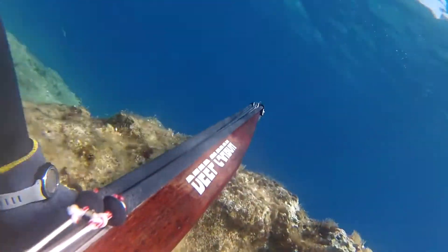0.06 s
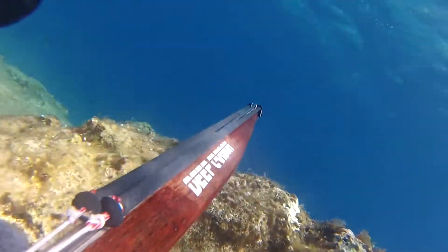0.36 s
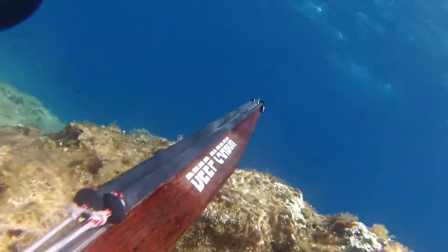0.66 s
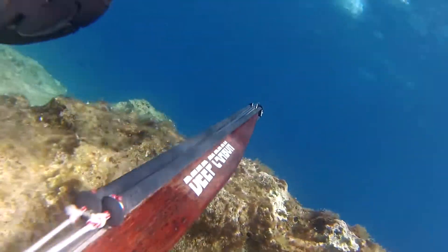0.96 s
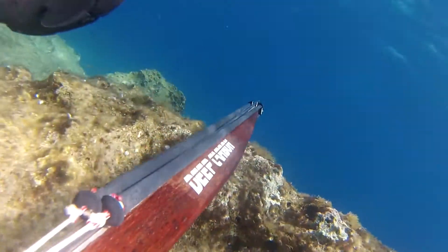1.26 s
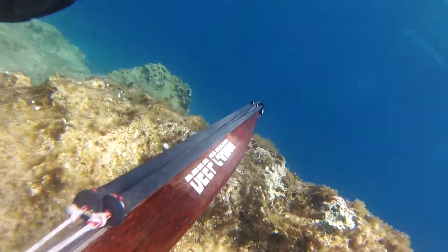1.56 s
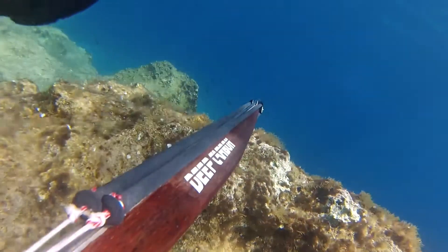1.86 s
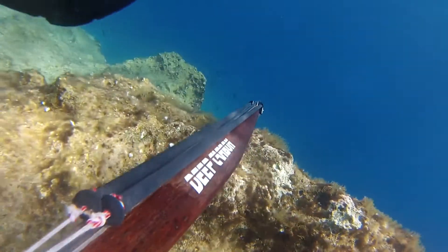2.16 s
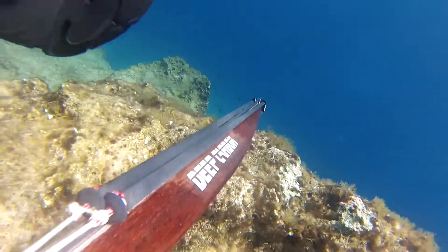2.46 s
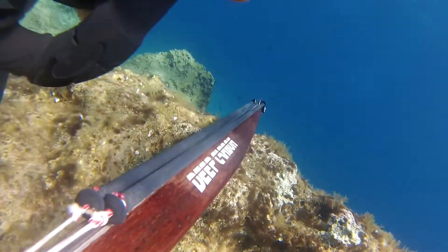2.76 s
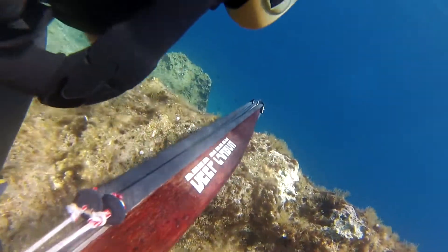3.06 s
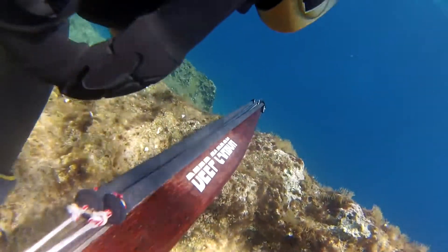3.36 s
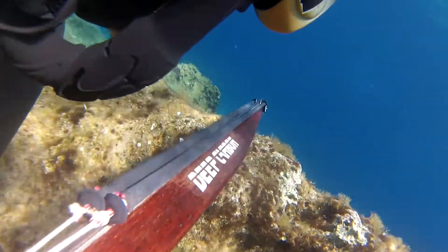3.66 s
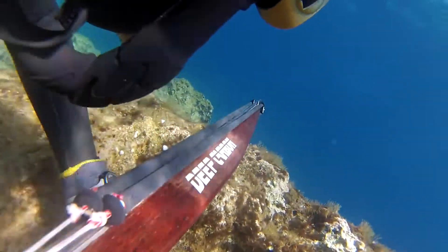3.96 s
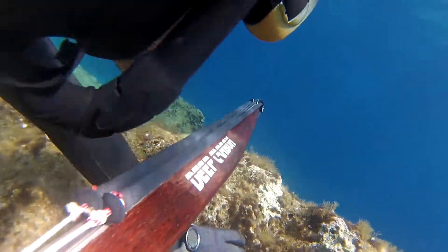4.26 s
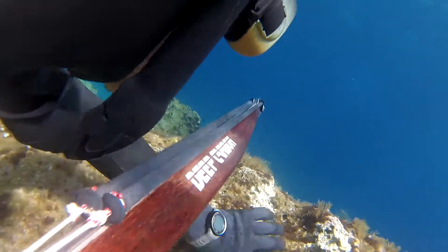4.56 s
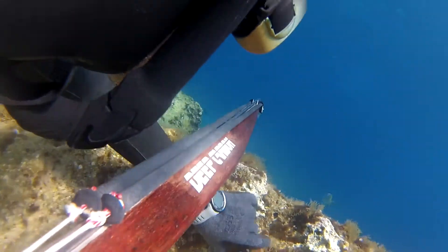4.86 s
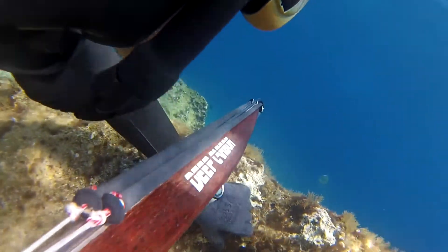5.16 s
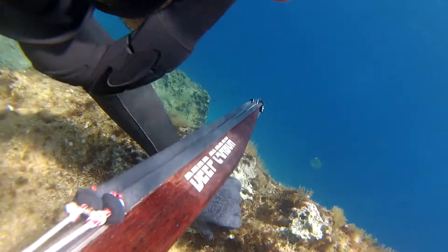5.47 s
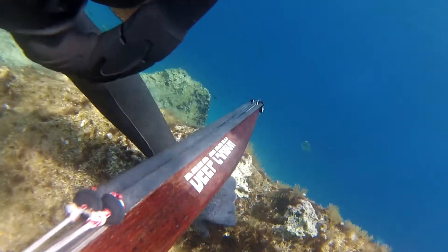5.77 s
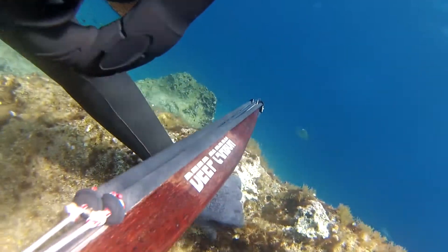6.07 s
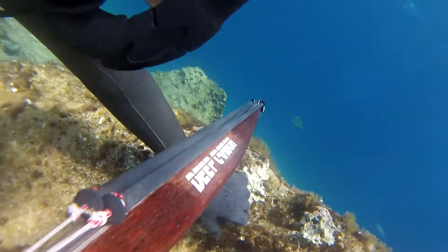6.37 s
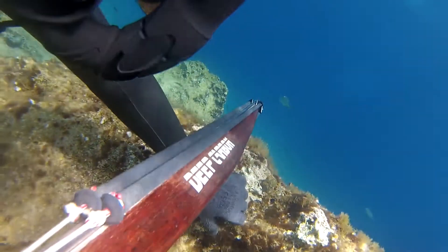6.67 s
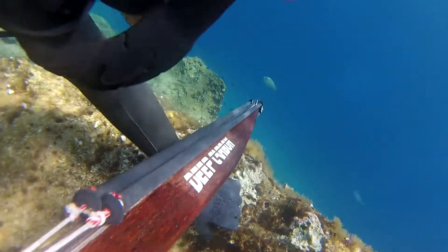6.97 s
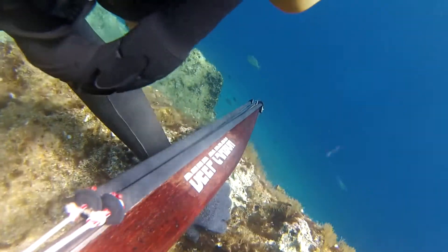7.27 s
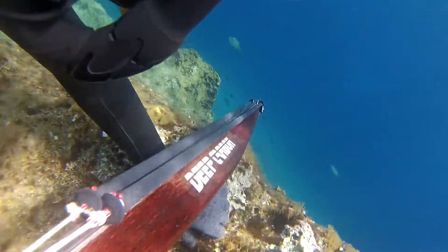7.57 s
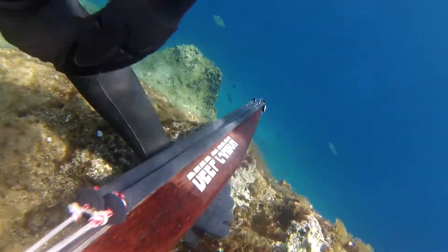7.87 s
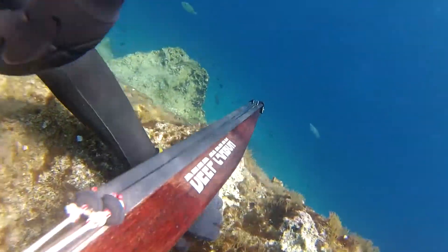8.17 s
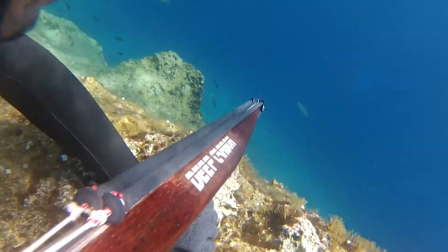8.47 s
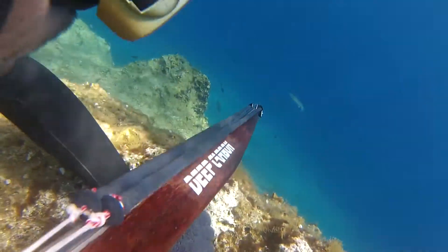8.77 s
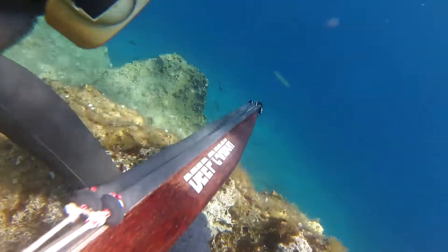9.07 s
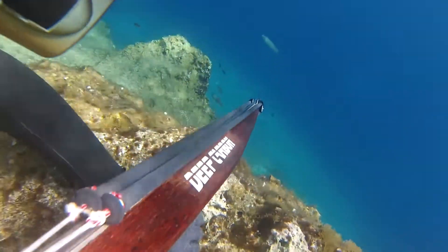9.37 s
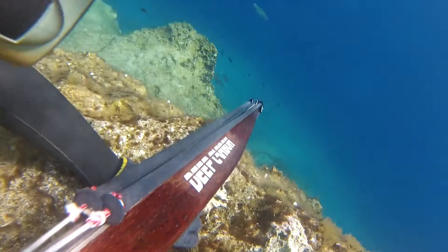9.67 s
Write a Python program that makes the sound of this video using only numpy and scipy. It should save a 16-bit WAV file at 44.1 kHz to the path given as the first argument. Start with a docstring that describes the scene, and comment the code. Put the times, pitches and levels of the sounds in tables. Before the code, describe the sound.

A burst of gulping air and low water buffeting opens, close and muffled, as a diver pulls along an underwater rock. Irregular clusters of sharp clacks with dull thumps come from a speargun jolting against the camera housing, mixed with rubber rubbing, light fizzing and tiny shrimp clicks. The rumble eases for a few seconds, then swells again with the sharpest knock and more rubbing.

```python
"""First comes a deep rumble of water with gulps and dull knocks, heard inside a camera housing on a
speargun as a free diver pulls himself along a rock. Water buffets the housing, and the gun knocks in
its mount, each knock a click with a dip in pressure. Trapped air gulps and fizzes as it vibrates.
Glove and wetsuit rub and crunch on the rock, and shrimp snap on the reef over a faint hiss."""
import sys
import numpy as np
from scipy import signal
from scipy.fft import rfft, irfft
from scipy.io import wavfile
from scipy.ndimage import uniform_filter1d, minimum_filter1d

SR = 44100
rng = np.random.default_rng(int(sys.argv[2]) if len(sys.argv) > 2 else 0)


def digitize_waveform(pressure):
    """Quantize a signal to 16-bit integers and store it at the path in sys.argv[1].

    Rows of a 2-D input are taken as channels; values are limited to [-1, 1].
    """
    field = np.atleast_2d(pressure).T
    bounded = np.clip(field, -1, 1)
    quanta = np.round(bounded * 32767).astype(np.int16)
    wavfile.write(sys.argv[1], SR, quanta)


N = 437472
TIME = np.arange(N) / SR
SLOW_TIME = np.arange(0, N, 40) / SR   # coarser steps, enough for movements

# Each TONE table gives the balance from low to high pitch.
# the surge, slow swings of water pressure: pitch_hz, level_db
SURGE_TONE = [(8.2, -33), (14, 10.5), (35, -0.5), (47, -8.5), (65, -16.5), (140, -29), (180, -35),
              (310, -120)]
# eddies, small swirls of water: pitch_hz, level_db
EDDY_TONE = [(45, -11), (75, -4), (130, -1), (190, -12), (280, -17.5), (450, -26.5)]
# the current flowing past the housing: time_s, level_db
CURRENT = [(0.0, -37), (0.44, -47), (1.08, -33), (1.6, -38.5), (2.2, -41.5), (2.7, -32), (2.9, -45.5),
           (3.2, -41.5), (3.6, -34.5), (4.03, -41.5), (4.36, -32.5), (5.1, -35), (5.95, -44), (6.55, -37),
           (7.15, -46), (7.7, -45.5), (8.55, -35), (8.9, -29.5), (9.35, -33), (9.6, -42), (9.92, -44)]
# shoves of water as the diver moves: peak_s, half_length_s, surge_db, eddy_db
SHOVES = [(0.19, 0.053, -23.5, -40), (0.292, 0.033, -18.5, -33), (0.462, 0.1, -24, -41.5),
          (0.593, 0.021, -15.5, -34.5), (0.812, .03, -15.5, -40.5), (0.986, 0.063, -29, -42),
          (1.257, 0.051, -31, -42), (1.818, 0.036, -20, -50), (2.039, 0.045, -30.5, -43),
          (2.305, 0.053, -29, -69), (2.553, 0.042, -21.5, -47.5), (2.86, .03, -41, -42.5),
          (3.014, 0.038, -22, -40), (3.369, 0.016, -16.5, -35), (3.513, 0.026, -27, -38),
          (3.63, 0.016, -17, -46), (3.875, 0.017, -27, -40), (4.26, 0.061, -20.5, -33),
          (4.406, 0.044, -24, -42), (4.623, 0.022, -22.5, -40.5), (4.74, 0.027, -21, -46),
          (5.06, 0.056, -28.5, -47.5), (5.229, 0.047, -29.5, -57), (5.46, 0.02, -37, -61),
          (5.581, 0.026, -31.5, -55), (6.267, 0.029, -19, -41), (6.379, 0.073, -28.5, -59),
          (6.602, 0.021, -21.5, -45), (7.83, 0.048, -16.5, -54), (8.06, 0.12, -31.5, -50.5),
          (8.297, 0.031, -21.5, -32), (8.376, 0.013, -15, -31), (8.711, 0.069, -19.5, -34.5),
          (8.778, 0.069, -14.5, -40), (9.011, 0.027, -13, -32.5), (9.113, 0.045, -23.5, -38),
          (9.272, 0.017, -22.5, -31.5), (9.421, 0.07, -25, -46)]
# the gun knocking in its mount: start_s, click_db, pitch_hz, dip_db (before dip_boost_db)
KNOCKS = [(0.117, -38, 970, -39), (0.237, -30.5, 860, -38), (0.284, -30, 910, -28), (0.423, -52, 1406, -25),
          (0.492, -47.5, 1400, -32), (0.554, -29, 1080, -27.5), (0.771, -26.5, 930, -51),
          (0.779, -26.5, 1310, -24), (0.964, -25.5, 1340, -27.5), (1.22, -37.5, 930, -35),
          (1.28, -36, 1180, -37.5), (1.713, -39, 1070, -40), (1.774, -32.5, 885, -30),
          (1.824, -41.5, 918, -37.5), (1.842, -38.5, 939, -45), (1.987, -31, 1150, -48),
          (1.999, -23, 1200, -27.5), (2.266, -39.5, 1230, -38.5), (2.282, -31, 874, -52),
          (2.461, -55, 1160, -32.5), (2.522, -36, 970, -34.5), (2.683, -47.5, 1310, -39),
          (2.841, -33.5, 1270, -50), (2.958, -41.5, 939, -40), (3.28, -38.5, 1190, -39),
          (3.326, -31, 910, -32), (3.373, -30, 1220, -25.5), (3.587, -28, 1270, -29),
          (3.612, -25.5, 1210, -28.5), (4.221, -24.5, 1120, -33), (4.234, -34, 1340, -26),
          (4.253, -33.5, 888, -44), (4.271, -38, 930, -38), (4.311, -30.5, 980, -28),
          (4.333, -32, 1100, -53), (4.342, -33, 860, -21.5), (4.399, -35, 1300, -35),
          (4.524, -33.5, 1190, -31.5), (4.579, -32, 900, -33), (5.24, -41.5, 1220, -45),
          (6.221, -46, 930, -37), (6.254, -34, 960, -39), (6.586, -37, 1320, -37.5),
          (7.796, -23, 1150, -23.5), (8.158, -41.5, 1500, -41), (8.26, -48, 1230, -30.5),
          (8.298, -17, 1060, -22), (8.334, -28, 890, -28.5), (8.384, -38, 990, -33),
          (8.414, -44.5, 996, -33), (8.458, -45.5, 1300, -35.5), (8.691, -26, 960, -26.5),
          (8.78, -24.5, 1430, -23), (8.931, -34, 1150, -27), (8.957, -29.5, 905, -30.5),
          (9.01, -31.5, 1280, -23), (9.039, -38.5, 1420, -37), (9.099, -33.5, 1400, -34),
          (9.261, -33.5, 1220, -20), (9.304, -33.5, 1160, -35)]
# the notes the mount rings with: pitch_hz, relative_db, ring_s (time to fade by 60 dB)
MOUNT_NOTES = [(480, -10.5, 0.021), (694, -2.5, 0.0067), (1030, 1, 0.0091), (1230, -6, 0.012),
               (1745, -7, 0.006), (2010, -15.5, 0.0033)]
# pockets of trapped air: start_s, peak_db, pitch_hz, ring_cycles (to fade by 60 dB)
GULPS = [(0.041, -31, 99.2, 13), (0.055, -45.5, 750, 37), (0.133, -29, 151, 0.5), (0.147, -37, 1950, 75),
         (0.204, -20.5, 76, 8), (0.236, -32, 730, 6), (0.244, -37, 2340, 39), (0.27, -32, 354, 6),
         (0.275, -50, 3430, 45), (0.298, -23.5, 257, 7.5), (0.37, -36, 262, 13), (0.424, -34, 744, 19),
         (0.431, -28, 280, 20), (0.454, -16, 73, 7.5), (0.462, -28, 267, 23), (0.477, -21.5, 100, 6.5),
         (0.478, -28, 247, 13), (0.491, -34.5, 730, 14), (0.497, -25.5, 268, 12), (0.966, -29.5, 637, 17),
         (1.148, -38.5, 235, 7), (2.178, -54.5, 3400, 50), (2.282, -22, 728, 14), (2.864, -43, 155, 16),
         (6.178, -34.5, 181, 3), (7.846, -34.5, 300.4, 4.5), (8.083, -44.5, 2820, 74),
         (8.105, -52, 3800, 63), (8.108, -46, 274, 40), (8.287, -21, 110, 3), (8.307, -17, 189, 9.5),
         (8.624, -42.5, 1380, 27), (8.692, -29.5, 990, 12), (9.265, -24, 123, 6.5)]
# water squeezed out of the suit: middle_s, half_length_s, level_db
SQUELCHES = [(0.232, 0.049, -50), (0.545, .05, -46.5), (1.45, 0.23, -60), (3.468, 0.072, -50.5),
             (1.75, 0.12, -61.5), (2.8, .25, -67), (4.4, 0.069, -67), (5.2, 0.29, -70), (6.35, 0.19, -66),
             (8.873, 0.056, -52.5), (9.25, 0.12, -58.5), (9.748, 0.25, -63.5)]
# strokes of wetsuit and glove: peak_s, rise_s, fade_s, dull_db, bright_db
STROKES = [(0.15, 0.044, 0.05, -53, -62.5), (0.28, 0.069, .55, -52.5, -58.5), (1.7, 0.94, 0.71, -63, -74.5),
           (2.81, 0.073, 0.055, -61.5, -76), (4.2, .12, 0.2, -57, -60), (4.7, 0.57, 0.77, -62.5, -73),
           (6.7, 0.37, 0.26, -73, -72), (7.791, 0.32, 0.4, -64, -71.5), (8.07, 0.11, .11, -68, -65),
           (8.74, 0.16, 0.33, -57, -67.5), (9.22, 0.15, 0.28, -51.5, -58.5), (9.75, 0.16, 0.6, -58, -65)]
# the lower notes of the housing: pitch_hz, width_hz, relative_db
HOUSING_LOW = [(707, 98, 6), (1237, 210, -2)]
# the higher notes of the housing: pitch_hz, width_hz, relative_db
HOUSING_HIGH = [(1974, 58, 12.5), (2280, 235, 8.5), (3373, 120, 4), (4920, 260, -7)]
# short brushes over the weedy rock: middle_s, half_length_s, level_db
BRUSHES = [(1.386, 0.029, -49), (3.156, 0.031, -60.5), (3.48, 0.027, -45), (3.535, 0.026, -57.5),
           (3.618, 0.019, -58), (3.875, 0.028, -50.5), (7.724, .06, -70), (8.093, 0.032, -65)]
# brushed weed: pitch_hz, level_db
BRUSH_TONE = [(900, -13.5), (1350, -4.5), (1750, 2), (2600, -16.5), (3600, -15), (5500, -28.5), (7200, -28),
              (12000, -39)]
# the glove crunching on gritty rock: middle_s, half_length_s, level_db
CRUNCHES = [(0.037, .07, -62.5), (0.327, 0.22, -63), (6.647, 0.2, -71.5), (7.05, .12, -71),
            (7.7, 0.17, -66), (9.199, 0.071, -64.5), (9.787, 0.076, -65.5)]
# crunched grit: pitch_hz, level_db
GRIT_TONE = [(1500, -11), (2150, 5.5), (2900, -8), (3500, -2), (5000, -16), (7000, -11), (10000, -21)]
# hard ticks of the gun's fittings: start_s, peak_db, pitch_hz
TICKS = [(0.022, -41, 5560), (0.096, -39.5, 5200), (0.097, -42.5, 1270), (0.221, -44, 2100),
         (0.244, -45, 5400), (2.4245, -27, 2100), (2.4251, -31.5, 3380), (2.864, -52, 4900),
         (4.223, -50, 2700), (7.796, -49, 2500), (8.298, -38.5, 2930), (8.783, -48, 2500)]
# shrimp close by: start_s, peak_db, pitch_hz
SNAPS = [(0.293, -45.5, 5550), (0.419, -47, 9500), (0.4885, -48, 9000), (0.769, -44.5, 6000),
         (0.857, -50, 6900), (1.1233, -49, 6540), (1.286, -50, 5490), (1.544, -47, 6740),
         (1.7795, -50, 4730), (2.4249, -39, 6740), (2.8635, -43.5, 4850), (3.7334, -52, 6750),
         (4.14, -37.5, 10600), (4.562, -51, 8980), (5.143, -51.5, 4770), (5.5664, -51, 5090),
         (5.887, -45.5, 6960), (6.231, -48, 7000), (7.1001, -51, 6650), (7.459, -47.5, 6640),
         (8.298, -48, 5900), (8.696, -44, 5130), (8.773, -51, 4500), (8.7802, -47.5, 4560),
         (9.239, -46, 6570), (9.2773, -43, 9590)]
# the hiss of the electronics: pitch_hz, level_db
HISS_TONE = [(200, 0.5), (330, -3), (480, -5.5), (720, -1), (900, -11), (1200, -8), (1600, -10),
             (2300, -11.5), (3050, -15.5), (6800, -19), (8500, -20.5), (11500, -20.5), (13800, -24),
             (15500, -28)]
# the whine of the electronics: pitch_hz, width_hz, level_db
WHINE = [(4376, 14, -89), (13067, 16, -88), (13126, 30, -91)]


def water(surge, eddy, eddies_per_s=80, flutter_db=2.5):
    """Slow pressure swings push on the housing, with lumpy eddies riding on them."""
    swings = coloured(rng.standard_normal(N), SURGE_TONE)
    power = uniform_filter1d(np.abs(signal.hilbert(swings)) ** 2 / 2, size=1100)
    even_swings = swings / np.sqrt(power + 0.0045)   # evened out, so the flow sets their size
    lumps = grains(eddies_per_s, spread_db=2) * from_db(flutter_db * drift(25))
    return cut(even_swings * surge, 158, "low") + coloured(lumps, EDDY_TONE) * eddy


def flow(eddy_offset_db=-20.5, surge_wake_db=-11.5, eddy_wake_db=-15, wake_fade_s=0.082):
    """Strength of the surge and the eddies: a current, plus shoves that each leave a fading wake."""
    current_db = np.interp(SLOW_TIME, *np.transpose(CURRENT))
    power = from_db([current_db, current_db + eddy_offset_db]) ** 2
    for peak_s, half_s, surge_db, eddy_db in SHOVES:
        wake = from_db([[surge_wake_db], [eddy_wake_db]]) * swell(peak_s, half_s, wake_fade_s)
        shove = np.maximum(hump(peak_s, half_s), wake)
        power += (from_db([[surge_db], [eddy_db]]) * shove) ** 2
    return [per_sample(strength) for strength in np.sqrt(power)]


def knocks(ring_db=-3, ring_s=0.007, dip_s=0.0025, dip_boost_db=13, rebound_hz=24):
    """Each knock clacks on the mount, bounces twice and pushes the housing wall, which swings back."""
    clicks, dips, t = np.zeros(N), np.zeros(N), np.arange(SR // 8) / SR
    dip = -peak_one(t * np.exp(-(t / dip_s) ** 1.27 / 2))
    for start_s, click_db, hz, dip_db in KNOCKS:
        body = mount_ring(t, change_db=2 * rng.standard_normal(len(MOUNT_NOTES)))
        clack = cut(body - from_db(ring_db) * ring(t, hz, ring_s), 2800, "low", order=4)
        clack = peak_one(clack) * from_db(click_db)
        add(clicks, start_s, clack)
        add(clicks, start_s + rng.uniform(0.001476, 0.00379), clack * from_db(-9))
        add(clicks, start_s + rng.uniform(0.00626, 0.016), clack * from_db(-20))
        add(dips, start_s, dip * from_db(dip_db + dip_boost_db))
    return clicks + cut(dips, rebound_hz, "high")


def mount_ring(t, change_db):
    """The struck mount rings with all its notes; change_db makes each one louder or softer."""
    return sum((-1) ** k * from_db(db + change_db[k]) * ring(t, hz, ring_s)
               for k, (hz, db, ring_s) in enumerate(MOUNT_NOTES))


def gulps(glide=0.23, swell_cycles=0.75):
    """Air pockets pulse briefly, rising a little in pitch."""
    out, t = np.zeros(N), np.arange(SR // 6) / SR
    for start_s, peak_db, hz, cycles in GULPS:
        pulse = ring(t, hz * (1 + glide * t), cycles / hz) * fade_in(t, swell_cycles / hz)
        add(out, start_s, peak_one(pulse) * from_db(peak_db))
    return out


def gurgle(dull, per_pocket_per_s=45, cycles=9):
    """Water squeezed from the suit burbles through small pockets of air."""
    pockets, t = np.zeros(N), np.arange(SR // 12) / SR
    squeeze = np.hypot(humps(SQUELCHES), dull * from_db(-11))   # rubbing squeezes a little too
    for hz in np.geomspace(225, 420, num=6):
        blip = ring(t, hz, cycles / hz) * fade_in(t, 1 / hz) * (220 / hz) ** 1.2
        pockets += signal.oaconvolve(grains(per_pocket_per_s, spread_db=5.5), blip)[:N]
    return rms_one(pockets) * squeeze


def fizz(bright, base_per_s=42, base_db=-57, cycles=34):
    """Harder rubbing frees more and louder bubbles; the smaller ones ping higher and fainter."""
    out, t = np.zeros(N), np.arange(SR // 30) / SR
    effort = bright / from_db(-65.5)   # an effort of 1 gives the base rate and level
    births = np.flatnonzero(rng.random(N) < base_per_s * effort / SR)
    for i, (size, force) in zip(births, rng.standard_normal((len(births), 2))):
        hz = 2400 * np.exp(-0.22 * size)
        ping = ring(t, hz * (1 + 2 * t), cycles / hz) * fade_in(t, 2 / hz)
        gain = from_db(base_db + 2 * force + size) * effort[i] ** 0.2
        add(out, i / SR, peak_one(ping) * gain)
    return out


def sliding(dull, bright, slips_per_s=1000, flutter_db=3):
    """The rubber suit sticks and slips in tiny jerks that make the housing ring."""
    slips = grains(slips_per_s, spread_db=1.5) * from_db(flutter_db * drift(50))
    low, high = [sum(from_db(db) * resonance(slips, hz, width_hz) for hz, width_hz, db in notes)
                 for notes in (HOUSING_LOW, HOUSING_HIGH)]
    low = cut(cut(low, 2150, "low", order=4), 440, "high", order=4)
    high = cut(cut(high, 5700, "low"), 1710, "high")
    return rms_one(low) * dull + rms_one(high) * bright


def rubbing(resting_db=-82):
    """Strength of the dull and the bright rub: each stroke builds up, then fades as the arm slows."""
    power = from_db(resting_db) ** 2   # the suit is never quite still
    for peak_s, rise_s, fade_s, dull_db, bright_db in STROKES:
        power = power + (from_db([[dull_db], [bright_db]]) * swell(peak_s, rise_s, fade_s)) ** 2
    return [per_sample(strength) for strength in np.sqrt(power)]


def brushes():
    """The glove sweeps over weed in short swelling hisses."""
    return humps(BRUSHES) * coloured(grains(per_s=4000, spread_db=1), BRUSH_TONE)


def grit():
    """Grains of rock give way under the glove, each with a crisp tick."""
    return humps(CRUNCHES) * coloured(grains(per_s=220, spread_db=4.5), GRIT_TONE)


def ticks(ring_s=0.0099, tail_s=0.041, tail_db=-24, rise_s=0.00025):
    """A fitting on the gun rings for an instant with three close notes."""
    out, t = np.zeros(N), np.arange(SR // 30) / SR
    for start_s, peak_db, hz in TICKS:
        notes = sum(weight * ring(t, hz * ratio, ring_s)
                    for ratio, weight in ((0.84, -0.33), (1, 0.51), (1.15, -0.44)))
        tick = (notes + from_db(tail_db) * ring(t, hz, tail_s)) * fade_in(t, rise_s)
        add(out, start_s, peak_one(tick) * from_db(peak_db))
    return out


def rattle(eddy, per_s=35, under_eddies_db=-23):
    """Eddies jostle the gun, so it chatters faintly in its mount."""
    body = mount_ring(np.arange(SR // 30) / SR, change_db=np.zeros(len(MOUNT_NOTES)))
    chatter = signal.oaconvolve(grains(per_s, spread_db=0), body)[:N]
    return rms_one(cut(chatter, 2500, "low", order=4)) * eddy * from_db(under_eddies_db)


def snaps(fade_s=0.0092, tail_s=0.1, tail_db=-20, rise_s=0.00048):
    """Nearby shrimp snap: each is a bright burst that dies in milliseconds, with a faint tail."""
    out, t = np.zeros(N), np.arange(SR // 30) / SR
    shape = fade_in(t, rise_s) * (from_db(-60 * t / fade_s) + from_db(tail_db - 60 * t / tail_s))
    for start_s, peak_db, hz in SNAPS:
        burst = resonance(rng.standard_normal(len(t)) * shape, hz, width_hz=0.49 * hz)
        add(out, start_s, peak_one(burst) * from_db(peak_db))
    return out


def reef(level_db=-79):
    """Distant shrimp make a thin crackle."""
    crackle = sum(resonance(grains(per_s=18, spread_db=4.5), hz, width_hz=350)
                  for hz in (3550, 5130, 6800, 6730, 10860, 13200))
    return rms_one(crackle) * from_db(level_db)


def electronics(hiss_db=-64):
    """The camera's electronics hiss, with a few thin, unsteady whines."""
    whine = np.zeros(N)
    for hz, width_hz, db in WHINE:
        band = resonance(rng.standard_normal(N), hz, width_hz)
        whine += from_db(db) * rms_one(resonance(band, hz, width_hz))
    return whine + from_db(hiss_db) * coloured(rng.standard_normal(N), HISS_TONE)


def from_db(db):
    """Turn decibels into a number to multiply by."""
    return 10 ** (np.asarray(db) / 20)


def rms_one(x):
    """Scale to an average (rms) level of 1."""
    return x / np.sqrt(np.mean(x ** 2) + 1e-20)


def peak_one(x):
    """Scale to a peak of 1."""
    return x / (np.abs(x).max() + 1e-20)


def add(out, start_s, sound):
    """Mix a short sound into out."""
    i = int(np.clip(start_s * SR, 0, N - 1))
    out[i:i + len(sound)] += sound[:N - i]


def cut(x, hz, keep, order=2):
    """Keep the "low" or the "high" side of hz; a higher order cuts more steeply."""
    return signal.sosfilt(signal.butter(order, hz, keep, fs=SR, output="sos"), x)


def coloured(x, tone):
    """Shape a sound with a TONE table, fading beyond its ends; the average level is 1."""
    hz, db = np.transpose(tone)
    all_hz = np.maximum(np.arange(N // 2 + 1) * SR / N, 1)
    ends = np.minimum(all_hz / hz[0], 1) ** 4 * np.minimum(hz[-1] / all_hz, 1) ** 4
    gain = from_db(np.interp(np.log(all_hz), np.log(hz), db))
    return rms_one(irfft(rfft(x) * ends * gain, N))


def resonance(x, hz, width_hz):
    """Let through a band of pitches around hz."""
    r = np.exp(-np.pi * width_hz / SR)
    feedback = [1, -2 * r * np.cos(2 * np.pi * hz / SR), r * r]
    return signal.lfilter(np.array([1, 0, -1]) * (1 - r * r) / 2, feedback, x + 1e-18)


def ring(t, hz, ring_s):
    """A struck note that fades by 60 dB in ring_s."""
    return np.sin(2 * np.pi * hz * t) * from_db(-60 * t / ring_s)


def fade_in(t, rise_s):
    """A soft start, from 0 toward 1."""
    return 1 - np.exp(-t / rise_s)


def grains(per_s, spread_db):
    """Clicks at random times; more spread makes their sizes more uneven."""
    sizes = from_db(spread_db * np.minimum(rng.exponential(1, N), 4)) * rng.choice([-1, 1], N)
    return sizes * (rng.random(N) < per_s / SR)


def drift(turns_per_s):
    """A value that wanders at random around 0."""
    points = rng.standard_normal(4000)
    return np.interp(TIME * turns_per_s, np.arange(len(points)), points)


def hump(middle_s, half_s):
    """A smooth rise to 1 and back."""
    return np.exp(-np.minimum(((SLOW_TIME - middle_s) / half_s) ** 2, 50))


def humps(table):
    """A loudness curve with one hump for each row."""
    return per_sample(sum(from_db(db) * hump(middle_s, half_s) for middle_s, half_s, db in table))


def swell(peak_s, rise_s, fade_s):
    """A smooth rise to 1, then a fading tail."""
    tail = np.exp(-np.abs(SLOW_TIME - peak_s) / fade_s)
    return np.where(SLOW_TIME < peak_s, hump(peak_s, rise_s), tail)


def per_sample(curve):
    """Fill in a slow curve for every sample."""
    return np.interp(TIME, SLOW_TIME, curve)


def scene():
    """Water, gun, air and shrimp reach one microphone through the housing wall."""
    surge, eddy = flow()
    dull, bright = rubbing()
    handling = knocks() + rattle(eddy) + ticks() + sliding(dull, bright) + brushes() + grit()
    air = gulps() + gurgle(dull) + fizz(bright)
    return (water(surge, eddy) + air + handling + snaps() + reef() + electronics())[None]


def record(dry, ceiling_db=-10, top_hz=15500):
    """A limiter turns the biggest swings down, and the highest treble is cut steeply."""
    allowed = np.minimum(1, from_db(ceiling_db) / (np.abs(dry) + 1e-9))
    gain = uniform_filter1d(minimum_filter1d(allowed, size=700), size=700)
    return signal.sosfilt(signal.ellip(10, 0.1, 80, top_hz, fs=SR, output="sos"), dry * gain)


dry = scene()
out = record(dry)
digitize_waveform(out)
```